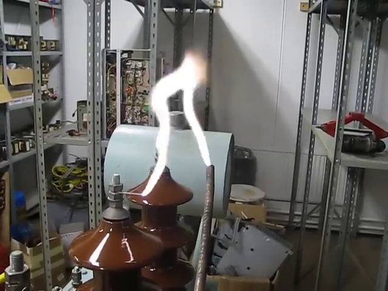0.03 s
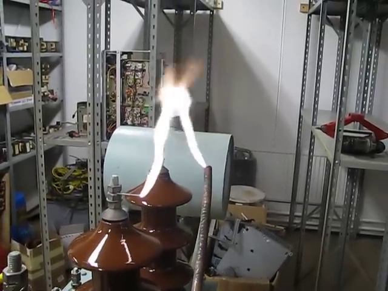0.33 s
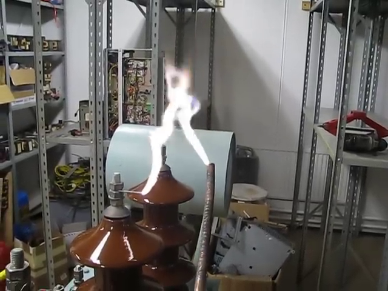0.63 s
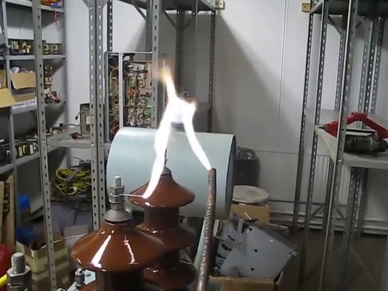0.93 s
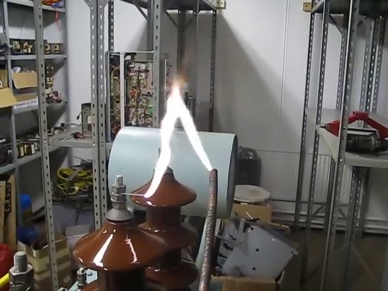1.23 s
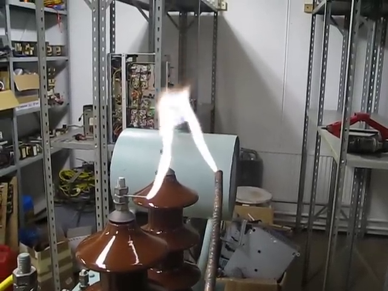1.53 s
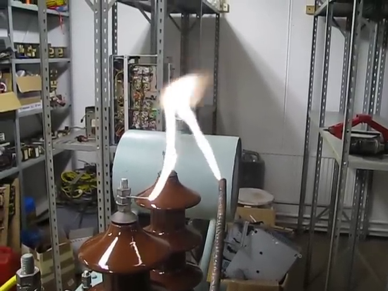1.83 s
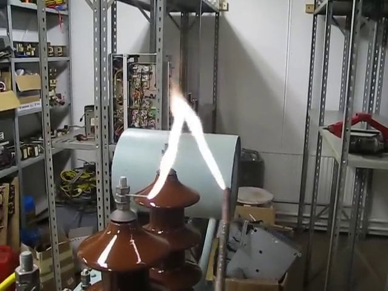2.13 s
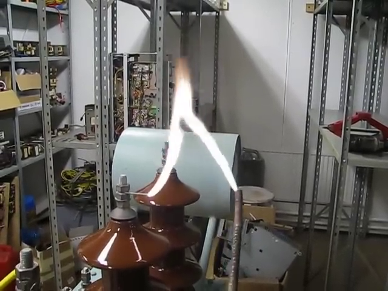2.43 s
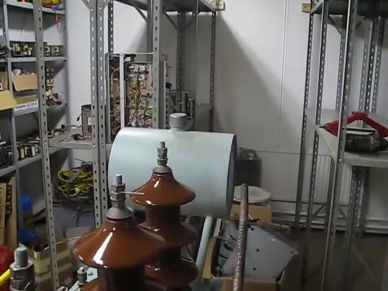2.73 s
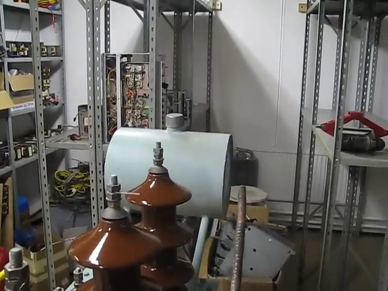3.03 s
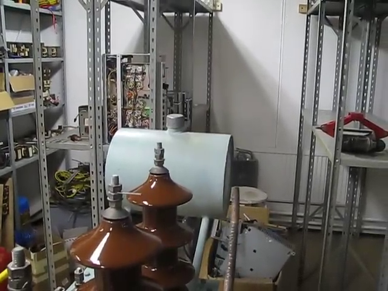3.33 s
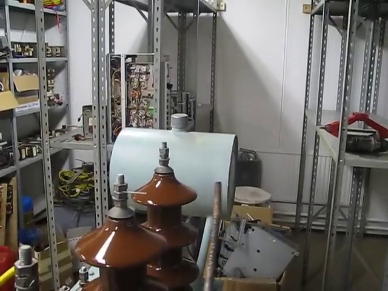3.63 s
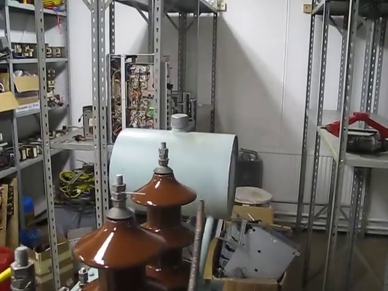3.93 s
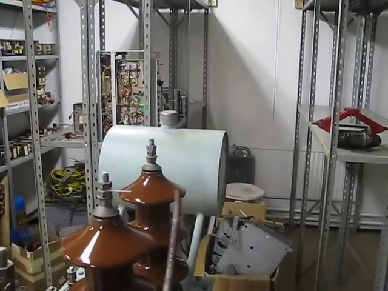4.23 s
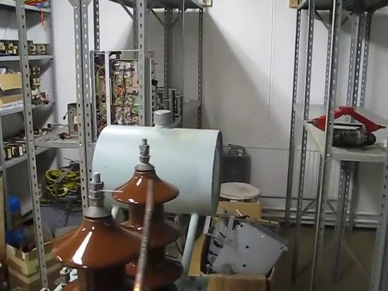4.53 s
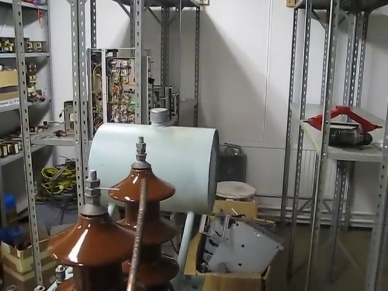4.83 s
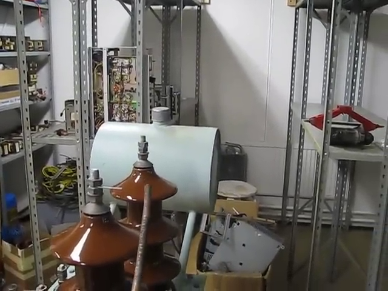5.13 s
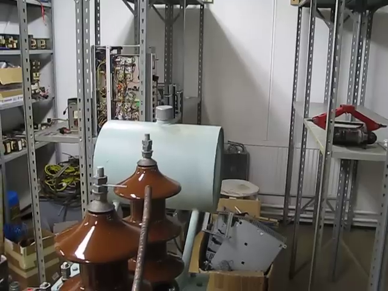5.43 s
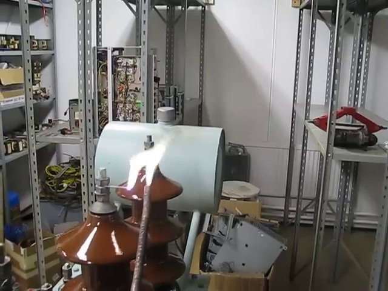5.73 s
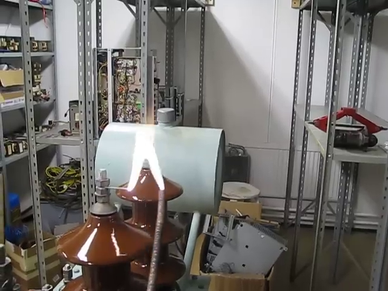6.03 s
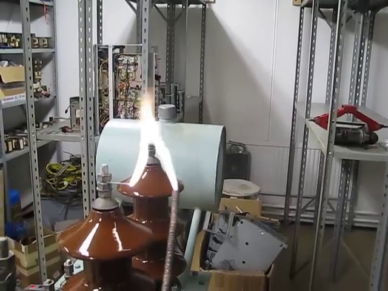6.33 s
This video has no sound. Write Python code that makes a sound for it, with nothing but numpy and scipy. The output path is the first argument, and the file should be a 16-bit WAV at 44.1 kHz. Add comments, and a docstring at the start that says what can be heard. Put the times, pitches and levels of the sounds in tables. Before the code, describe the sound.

A loud electric arc burns between a transformer and a metal rod, a low buzzing drone with sizzling, fluttering puffs and sharp cracks. It cuts off abruptly, leaving room air and a faint transformer hum. A soft hiss and rustle grow, quick runs of sparks tick, then a snap starts a new arc that swells. Heard from nearby in a slightly reverberant workshop.

```python
"""A loud, crackling drone: a mains arc burns between a transformer bushing and a hand-held rod in a workshop.
Every half cycle the channel reheats with a pressure pulse and a tick; its foot sizzles and its flame
folds, puffs and cracks. At 2.7 s it tears off, leaving the faint hum of the core. The rod comes back
through corona hiss and runs of sparks; at 5.6 s the gap flashes over and a new arc grows."""
import sys
import numpy as np
from scipy import signal
from scipy.fft import rfft, irfft
from scipy.io import wavfile

SR = 44100
rng = np.random.default_rng(int(sys.argv[2]) if len(sys.argv) > 2 else 0)


def write(x):
    x = np.atleast_2d(x).T
    wavfile.write(sys.argv[1], SR, np.round(np.clip(x, -1, 1) * 32767).astype(np.int16))


N = 286650
T = np.arange(N) / SR
MAINS_HZ, STRIKE_S = 49.96, 5.6002
HALF_CYCLE_S = .5 / MAINS_HZ

# spectrum of the room air: frequency_hz, relative_db
AIR_SPECTRUM = [(15, -39), (25, 8), (102, -5.5), (152, -7), (194, -6), (449, -8.5), (500, -9), (587, -10),
                (1120, -11), (1680, -16.5), (7830, -21), (13800, -36.5), (15800, -18.5)]
# harmonics of the transformer core: pitch_hz, relative_db
CORE_HARMONICS = [(99.92, -60), (199.84, -67), (299.76, -68.5), (399.68, -68), (499.6, -70)]
# the faint low hum slowly grows louder as the recorder's gain recovers: time_s, gain_db
GAIN_RECOVERY = [(3.1, -3), (4.7, 3.5)]
# faint, thin, high whistling bands of noise: pitch_hz, half_width_hz, level_db
WHISTLE_BANDS = [(7770, 110, -69), (15400, 320, -69)]

# envelopes of the rod's rustle, the corona and the sizzle of the long arc: time_s, relative_db
RUSTLE_ENVELOPE = [(3.3, -69), (3.65, -59.5), (4.98, -57), (5.3, -45), (5.4, -60), (5.5, -53)]
CORONA_ENVELOPE = [(3.3, -62), (4.1, -60.5), (4.45, -54.5), (4.98, -49.5), (5.15, -55.5), (5.5, -55)]
SIZZLE_ENVELOPE = [(0.1, -34.5), (.6, -36.5), (.74, -41), (.86, -37.5), (1.06, -34.5), (1.18, -38.5),
                   (1.7, -36), (1.84, -40), (2.2, -41.5), (2.68, -42.5)]
# spectra of the rod and the gap, from rustle to flashover: frequency_hz, relative_db
RUSTLE_SPECTRUM = [(71, -48), (120, -3), (302, 1.5), (340, -11), (382, -2), (424, -5), (585, 0), (1200, -6),
                   (1590, -2.5), (4000, -15.5), (5200, -54), (8800, -120)]
CORONA_SPECTRUM = [(1470, -8), (2500, -39), (2790, -4), (5040, -3), (6070, -5), (7710, 0.5), (9950, -4),
                   (12000, -1.5), (14200, -5), (15800, -9)]
SPARK_SPECTRUM = [(300, -14), (900, -7.5), (1700, -1), (2500, -4), (3200, 3), (4600, 5.5), (5700, -1.5),
                  (7200, 8), (8500, 0.5), (10000, -0.5), (11400, 1), (13000, -2.5), (15500, -4)]
VOLLEY_SPECTRUM = [(300, -10.5), (2500, -2.5), (7000, 6), (11000, 4.5), (15000, 1.5)]
THUMP_SPECTRUM = [(25, -6), (90, 0.5), (400, 2.5), (900, -5), (2500, -19), (9000, -17)]
# runs of sparks across the cold gap: start_s, spark_count, strength_db, change_per_spark_db
SPARK_RUNS = [(4.4094, 6, -27, 0.6), (4.529, 4, -7, -0.7), (4.6075, 11, 0, -0.28), (4.8505, 4, -13.5, -2),
              (5.5376, 1, -13, -2), (5.5617, 1, -5, 0), (5.5683, 1, -3, 0), (5.5982, 1, 4, 0),
              (5.6198, 1, 1, 0)]

# loud cracks, as loops of the arc short out: time_s, strength_db
LOUD_CRACKS = [(0.0727, 0.5), (0.103, -2.5), (0.1824, -4.5), (0.2626, 0), (0.4018, -2), (0.4127, -1),
               (0.444, -3), (0.5826, 2.5), (0.9433, -5.5), (0.9834, -3), (1.2331, -4.5), (1.294, 0),
               (1.3745, -0.5), (1.7054, -2), (1.7544, -2), (1.8742, -5), (2.0938, -3.5), (2.3357, 8.5),
               (2.4538, -8), (2.6405, -1.5), (5.8996, -7.5), (5.9595, -3), (6.2701, -5.5), (6.47, -5)]
# spectra of a crack and of its shock front: frequency_hz, relative_db
CRACK_SPECTRUM = [(100, -5), (600, 5), (1700, 8.5), (3000, 6), (4500, 3.5), (5500, 3.5), (8000, -3),
                  (11000, -7.5), (15500, -17.5)]
SHOCK_SPECTRUM = [(600, -25), (2500, 2.5), (6500, 9.5), (9000, 0.5), (15500, 2.5)]
# spectra of the arc's sizzling foot and writhing channel: frequency_hz, relative_db
SIZZLE_SPECTRUM = [(1000, -33), (3000, -8.5), (5000, -3.5), (7800, -3.5), (9500, -6), (12000, -10.5),
                   (15500, -10.5)]
FLUTTER_SPECTRUM = [(30, -17), (100, -10.5), (170, -8), (210, -2), (255, 0), (330, -3.5), (420, 1),
                    (500, 2), (660, -6), (810, -3), (1000, -11.5), (1500, -11.5), (2500, -28.5),
                    (6000, -48)]
# spectra of the relighting tick and pressure pulse, long and short channel: frequency_hz, relative_db
LONG_TICK = [(200, -59), (800, 2.5), (1500, -4), (2500, -4.5), (4000, -7.5), (8000, -19.5), (15000, -50)]
SHORT_TICK = [(200, -7.5), (1300, 3), (1800, -3), (2650, 1), (3300, -1), (5000, -8), (8500, -12.5),
              (10500, -20), (15000, -15)]
LONG_PULSE = [(40, -30), (100, -5.5), (200, -3), (300, -0.5), (400, -6.5), (500, 1.5), (600, -7),
              (700, -19), (800, -14), (900, -20.5), (1000, -16.5), (1300, -29), (2500, -32), (5000, -57)]
SHORT_PULSE = [(40, -33), (100, -10), (200, -4), (300, -1.5), (400, -2.5), (500, 3), (600, -3), (700, -22),
               (800, -8.5), (900, -9.5), (1000, -7.5), (1300, -18.5), (2500, -29.5), (5000, -65)]
# folds of the long arc's flame: time_s, puff_db
FOLDS = [(.08, 10), (.25, 0), (0.418, 9), (.59, 3), (.68, -1), (.9, 4), (1.07, 0.5), (1.28, 4), (1.37, 3),
         (1.538, 7.5), (1.75, 0.5), (2.008, 7), (2.11, 7), (2.34, 1), (2.46, 2), (2.66, 3.5)]
# growth of the new arc's hum, flutter and sizzle: grown_relative_db, length_exponent
GROWTH = [(-19.5, 0.94), (-33, 0.62), (-38, 0.47)]
# burning times of the long arc and the new arc: start_s, end_s
BURNS = [(.0021, 2.70), (5.6087, 6.5)]

# reflections off nearby metal: left_delay_s, right_delay_s, gain
ECHOES = [(.00049, .00039, .28), (.004, .00403, .26), (.011, .0112, .07)]
# reverberation time of the workshop: frequency_hz, t60_s
ROOM_T60 = [(120, 0.47), (500, 0.64), (2000, 0.56), (5000, 0.45), (10000, 0.19), (16000, 0.59)]
# mismatch of the two microphones: frequency_hz, left_minus_right_db
MIC_MISMATCH = [(100, 0), (600, .1), (1100, -.3), (2000, -2.2), (4000, -.5), (8000, 1.2), (10500, 2.5),
                (13000, -.5)]


def undb(db):
    """Amplitude grows tenfold per 20 dB."""
    return 10 ** (np.asarray(db) / 20)


def unit(x):
    """Normalisation to rms 1."""
    return x / np.sqrt(np.mean(x ** 2) + 1e-20)


def envelope(table, t):
    """Gain at times t, interpolated in decibels."""
    return undb(np.interp(t, *np.transpose(table)))


def at_frequency(table, hz):
    """Interpolation on a log-frequency axis."""
    f, value = np.transpose(table)
    return np.interp(np.log(hz + 1), np.log(f), value)


def response(spectrum, centred=False, size=2048):
    """Impulse response: minimum phase gives a sudden onset, linear phase a centred pulse."""
    gain = undb(at_frequency(spectrum, np.fft.rfftfreq(size, 1 / SR)))
    if centred:
        return np.fft.fftshift(irfft(gain))
    cepstrum = irfft(np.log(gain))
    cepstrum[1:size // 2] *= 2
    cepstrum[size // 2 + 1:] = 0
    return irfft(np.exp(rfft(cepstrum)))


def convolve(x, h):
    """Convolution: every sample of x excites the impulse response h."""
    return signal.oaconvolve(x, h)[:N]


def colour(x, spectrum, centred=False):
    """A unit-energy filter shapes a white signal and conserves its power."""
    h = response(spectrum, centred)
    return signal.oaconvolve(x, h / np.linalg.norm(h), "same" if centred else "full")[:N]


def clicks(times, sizes):
    """Ideal impulses, each with a flat spectrum."""
    return np.bincount(np.clip(np.round(times * SR).astype(int), 0, N), sizes, N + 1)[:N]


def bursts(times, sizes, decay_s):
    """Exponential decay spreads the energy of each impulse into a noise burst."""
    fade = np.exp(-T[:SR // 20] / decay_s)
    power = convolve(clicks(times, sizes ** 2), fade / fade.sum())
    return np.sqrt(np.abs(power)) * rng.standard_normal(N)


def wander(steps, memory=.52):
    """Autoregression: each random value retains part of the one before."""
    return unit(signal.lfilter([1], [1, -memory], steps))


def crests(sharpness, crest_s):
    """Amplitude modulation that peaks at one voltage crest per mains cycle."""
    return unit(np.exp(sharpness * np.cos(2 * np.pi * MAINS_HZ * (T - crest_s))))


def diffuse(half_coherence_hz=2600, size=N):
    """A diffuse field at two close microphones is coherent in the bass, incoherent in the treble."""
    coherence = 1 / (1 + (np.fft.rfftfreq(size, 1 / SR) / half_coherence_hz) ** 2)
    weights = np.sqrt([1 + coherence, 1 - coherence]) / np.sqrt(2)
    mid, side = rfft(rng.standard_normal((2, size))) * weights
    return irfft(np.array([mid + side, mid - side]), size)


def direct_path(x, lag_s):
    """A path difference delays the sound at the right microphone."""
    lag = np.exp(-2j * np.pi * np.fft.rfftfreq(N, 1 / SR) * lag_s)
    return np.array([x, irfft(rfft(x) * lag, N)])


def near_echoes(x):
    """Specular reflections off nearby metal reach each microphone at its own time."""
    left_s, right_s, gain = np.transpose(ECHOES)
    return np.array([convolve(x, clicks(s, gain)[:SR // 20]) for s in (left_s, right_s)])


def shelves(x, db=-11, first_s=.002, decay_s=.0035):
    """Scattering off steel shelving gives dense early reflections."""
    t = T[:SR // 20]
    tails = diffuse(size=len(t)) * np.exp(-t / decay_s) * (t > first_s)
    return undb(db) * np.array([convolve(x, h / np.linalg.norm(h)) for h in tails])


def room(x, build_s=.0071):
    """Reverberation builds up and decays exponentially, fastest near 10 kHz."""
    hz, t, cells = signal.stft(diffuse(size=SR), SR, nperseg=256)
    decay = np.exp(-np.log(1000) * t / at_frequency(ROOM_T60, hz)[:, None])
    build = 1 - np.exp(-t / build_s)
    tails = signal.istft(cells * decay * build, SR)[1]
    return np.array([convolve(x, h / np.linalg.norm(h)) for h in tails])


def background(air_db=-55):
    """Superposition of diffuse room air, the core's even mains harmonics and thin whistling noise."""
    air = undb(air_db) * np.array([colour(side, AIR_SPECTRUM) for side in diffuse()])
    core = sum(undb(db) * np.sqrt(2) * np.sin(2 * np.pi * (hz * T + rng.random()))
               for hz, db in CORE_HARMONICS)
    f = np.fft.rfftfreq(N, 1 / SR)
    whistle = sum(undb(db) * unit(irfft(rfft(diffuse()) / (1 + 2j * (f - hz) / half_width), N))
                  for hz, half_width, db in WHISTLE_BANDS)
    return air + core * envelope(GAIN_RECOVERY, T) + whistle


def corona_and_rod(corona_db=-4, rustle_db=-5):
    """Corona discharge fizzes once per cycle and grows as the rustling rod nears the bushing."""
    fizz = colour(crests(3, crest_s=.013) * rng.standard_normal(N), CORONA_SPECTRUM)
    fizz *= undb(corona_db) * envelope(CORONA_ENVELOPE, T)
    rustle = colour(rng.standard_normal(N), RUSTLE_SPECTRUM)
    rustle *= undb(rustle_db) * envelope(RUSTLE_ENVELOPE, T)
    between_arcs = np.interp(T, [2.7, 2.9, 5.55, 5.6], [0, 1, 1, 0])
    return between_arcs * (fizz + rustle)


def discharges(rows, spectrum, gain_db, scatter_db=-12):
    """Each discharge (time_s, strength_db) radiates a shock that scatters off nearby metal."""
    t, strength_db = np.transpose(rows)
    sizes = undb(strength_db + gain_db)
    scatter = bursts(t + .00039, sizes * undb(scatter_db), decay_s=.00033)
    return colour(clicks(t, sizes) + scatter, spectrum)


def gap_sparks(spread_db=1.0, jitter_s=.00013):
    """Dielectric breakdown: within a run the cold gap sparks near the same phase of every cycle."""
    rows = []
    for start_s, count, db, change_db in SPARK_RUNS:
        k = np.arange(round(count))
        chance = rng.standard_normal((len(k), 2))
        late, harder = (chance - chance.mean(axis=0)).T
        rows += zip(start_s + k / MAINS_HZ + jitter_s * late, db + change_db * k + spread_db * harder)
    return discharges(rows, SPARK_SPECTRUM, gain_db=-.5)


def flashover(rate_hz=3520, count=3, spark_db=14, rush_db=9, thump_db=9):
    """Breakdown of the whole gap: a fast volley of sparks, a rush of hot gas and a thump of air."""
    k, start = np.arange(count), np.array([STRIKE_S])
    volley = clicks(STRIKE_S + k / rate_hz, undb(spark_db) * .5 ** k)
    rush = bursts(start, undb([rush_db]), decay_s=.0004)
    thump = clicks(start, undb([thump_db]))
    return -colour(volley + rush, VOLLEY_SPECTRUM), -colour(thump, THUMP_SPECTRUM)


def loop_cracks(lesser_share=.05, lesser_db=-10, spread_db=2.5):
    """Short circuits across loops of the arc: loud ones at set times, lesser ones by chance."""
    t = np.arange(*BURNS[0], HALF_CYCLE_S)
    chance, size = rng.random((len(t), 2)).T
    lesser = np.column_stack([t, lesser_db + spread_db * (2 * size - 1)])[chance < lesser_share]
    return discharges([*LOUD_CRACKS, *lesser], CRACK_SPECTRUM, gain_db=1.5)


def shock_fronts(gain_db=-6.5, db_per_db=1.76):
    """Nonlinear steepening: the harder a loud crack, the more its bright front stands out."""
    t, strength_db = np.transpose(LOUD_CRACKS)
    return colour(clicks(t, undb(gain_db + db_per_db * strength_db)), SHOCK_SPECTRUM)


def throb(db=-47, peak_s=5.72, rise_s=.045, fade_s=.95):
    """Asymmetry: the fresh arc burns harder in one polarity, adding a fading tone at the mains rate."""
    rise = np.clip((T - peak_s) / rise_s + 1, 0, 1)
    fade = np.exp(-np.maximum(T - peak_s, 0) / fade_s)
    return undb(db) * rise * fade * np.sqrt(2) * np.sin(2 * np.pi * MAINS_HZ * T)


def folding(t, hum_db=-21.5, flutter_db=-37, puff_s=.026, sag_s=.07):
    """Hum, flutter and sizzle gains of the long arc: each fold puffs and shortens the channel."""
    fold_s, puff_db = np.transpose(FOLDS)
    since = t[:, None] - fold_s
    boost_db = np.exp(-(since / puff_s) ** 2) @ puff_db
    # the hum swells before a fold and sags after it
    sag_db = 1.3 * np.sum(since / sag_s * np.exp(-(since / sag_s) ** 2), axis=1)
    return undb(hum_db - sag_db), undb(flutter_db + boost_db), envelope(SIZZLE_ENVELOPE, t)


def growing(t, grow_s=.87):
    """Hum, flutter and sizzle gains of the new arc follow power laws of its rising length."""
    length = np.clip((t - STRIKE_S) / grow_s, 0, 1)
    return [undb(db) * length ** exponent for db, exponent in GROWTH]


def arc_hum(t, drive, spectrum, gain_db, standing_share=.35, hold_s=.06, reflection_s=.0038):
    """Periodic heating gives one pressure pulse per half cycle; standing waves hold part of the tone."""
    keep = np.exp(-HALF_CYCLE_S / hold_s)
    held = signal.lfilter([1 - keep], [1, -keep], drive)
    sizes = drive + standing_share * (held - drive)
    pulses = -undb(gain_db) * colour(clicks(t, sizes), spectrum, centred=True)
    # a near reflection spreads each pulse over the cycle, which rounds the buzz into a drone
    spread = np.exp(-.8j * np.sin(2 * np.pi * np.fft.rfftfreq(2 * N, 1 / SR) * reflection_s))
    return irfft(rfft(pulses, 2 * N) * spread)[:N]


def arc(burn, gains, pulse, tick, hum_db, flutter_db, tick_db, spit_db, hiss_db,
        asymmetry, jitter_s, tick_spread_db, spit_spread_db):
    """An alternating-current arc relights every half cycle, radiating hum, flutter and crackle."""
    start_s, end_s = burn
    t = np.arange(start_s, N / SR, HALF_CYCLE_S)
    polarity = (-1) ** np.arange(len(t))
    pulse_scale = np.sqrt(SR * HALF_CYCLE_S)  # gives an impulse train rms 1
    drive, writhe, sizzle = np.array(gains(t)) * (t < end_s) * pulse_scale
    chance = np.clip(rng.standard_normal((len(t), 7)).T, -1.7, 1.7)
    pulse_late, pulse_size, tick_late, tick_size, spit_late, spit_size, hiss_size = chance
    hum = arc_hum(t, drive * (1 + asymmetry * polarity), pulse, hum_db)
    # the writhing channel makes each pulse a little stronger or weaker, earlier or later
    uneven = clicks(t + jitter_s * pulse_late, writhe * wander(pulse_size))
    flutter = undb(flutter_db) * colour(uneven, FLUTTER_SPECTRUM, centred=True)
    # the gas breaks down anew after every zero of the current
    tick_gain = writhe * undb(tick_db + tick_spread_db * tick_size)
    ticks = bursts(t + jitter_s * (tick_late - 1), tick_gain, decay_s=.00046)
    # the electrode spits early and late in one half cycle, and hisses in between
    spit_s = t + np.where(polarity > 0, .0022, -.002) + .00027 * spit_late
    spit_gain = sizzle * undb(spit_db + 4 * polarity + spit_spread_db * wander(spit_size))
    spits = bursts(spit_s, spit_gain, decay_s=.00011)
    hiss_gain = np.interp(T, t, sizzle * undb(hiss_db + 2 * hiss_size), left=0) / pulse_scale
    # a thin snap runs just ahead of the pressure pulse as the channel relights
    snap_gain = sizzle * undb(-5.5 + 2.9 * polarity + spit_spread_db * tick_size)
    snaps = bursts(t - .00045, snap_gain, decay_s=.00007)
    hiss = crests(1.1, crest_s=start_s + .006) * hiss_gain * rng.standard_normal(N)
    return hum, flutter, colour(ticks, tick) + colour(spits + snaps + hiss, SIZZLE_SPECTRUM)


def scene():
    """Direct sound, early reflections and reverberation superpose at two close microphones."""
    long_arc = arc(BURNS[0], folding, LONG_PULSE, LONG_TICK,
                   hum_db=-1.06, flutter_db=4, tick_db=-4, spit_db=-4, hiss_db=-20.5,
                   asymmetry=.068, jitter_s=.00033, tick_spread_db=3.5, spit_spread_db=1)
    new_arc = arc(BURNS[1], growing, SHORT_PULSE, SHORT_TICK,
                  hum_db=-.05, flutter_db=-2, tick_db=.5, spit_db=-9.5, hiss_db=-4.5,
                  asymmetry=.047, jitter_s=.00006, tick_spread_db=3.6, spit_spread_db=2)
    hum, flutter, crackle = np.add(long_arc, new_arc)
    volley, thump = flashover()
    cracks, sparks, approach = loop_cracks(), gap_sparks(), corona_and_rod()
    overhead = crackle + cracks + shock_fronts()
    at_gap = volley + approach + sparks
    direct = direct_path(hum + flutter + thump + throb() + overhead, lag_s=7e-6)
    direct += direct_path(at_gap, lag_s=26e-6)
    early = near_echoes(overhead + at_gap) + shelves(overhead + at_gap)
    arc_send = undb(-24) * hum + undb(-1) * flutter + undb(-4.5) * crackle + undb(-6) * cracks
    gap_send = undb(-4) * sparks + undb(-4.5) * volley + undb(1.5) * approach
    return direct + early + room(arc_send + gap_send) + background()


def record(dry, cutoff_hz=15900):
    """Transduction: each microphone has its own colour, peaks clip, and a low-pass cuts the top."""
    tinted = [convolve(x, response([(hz, side * db / 2) for hz, db in MIC_MISMATCH]))
              for x, side in zip(dry, (1, -1))]
    low_pass = signal.ellip(10, .1, 80, cutoff_hz, fs=SR, output="sos")
    return signal.sosfilt(low_pass, np.clip(tinted, -1, 1))


dry = scene()
out = record(dry)
write(out)
```